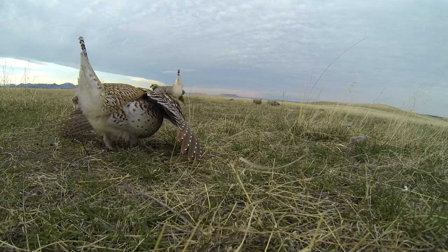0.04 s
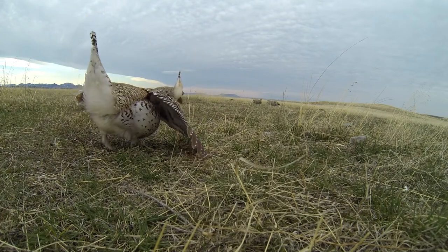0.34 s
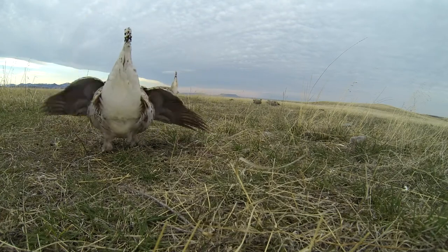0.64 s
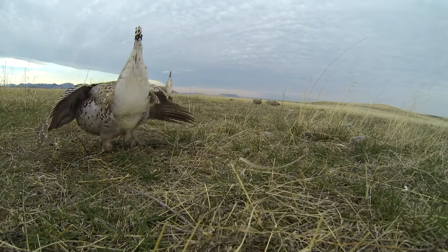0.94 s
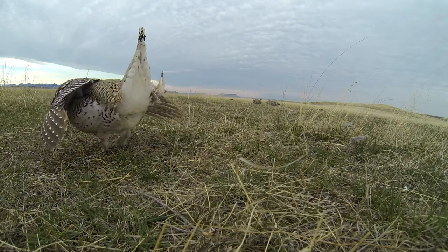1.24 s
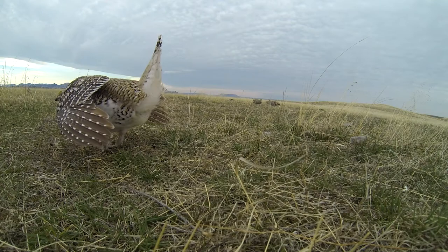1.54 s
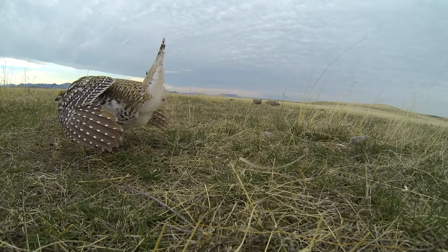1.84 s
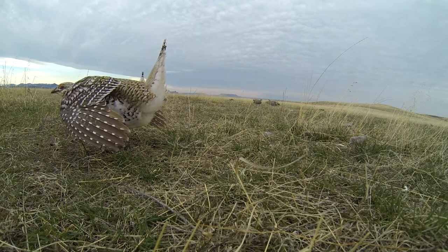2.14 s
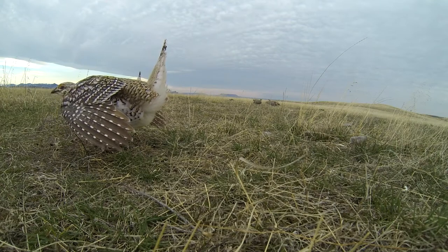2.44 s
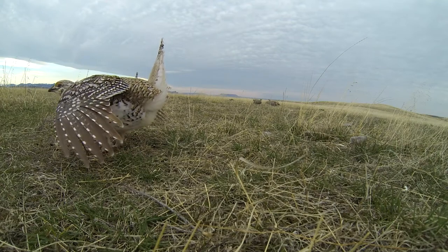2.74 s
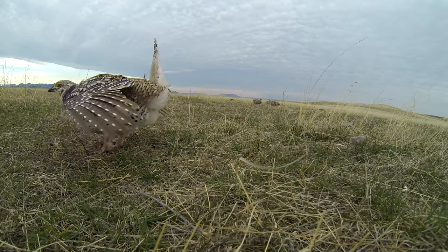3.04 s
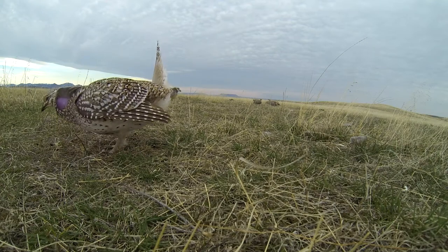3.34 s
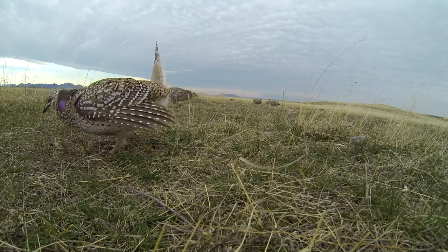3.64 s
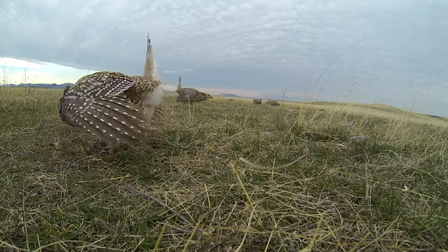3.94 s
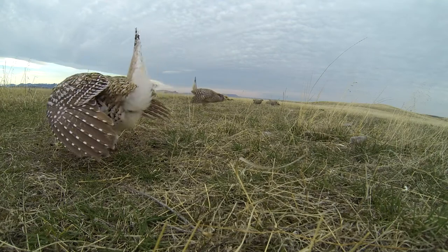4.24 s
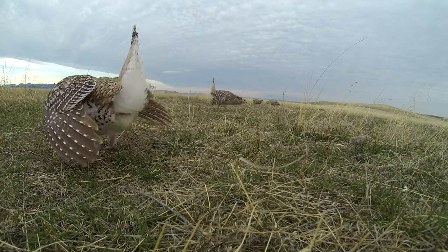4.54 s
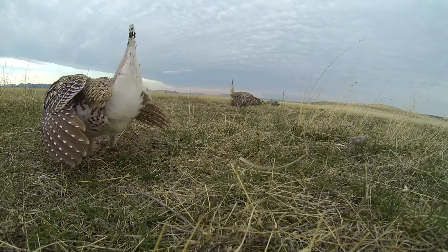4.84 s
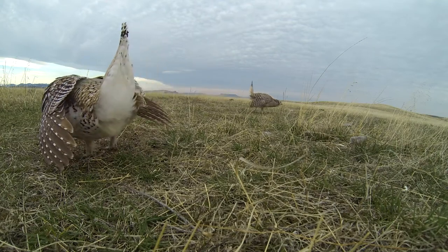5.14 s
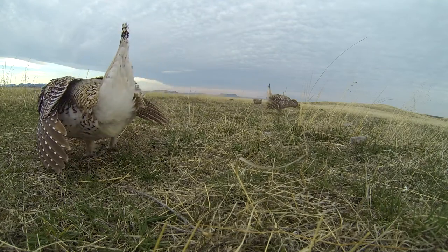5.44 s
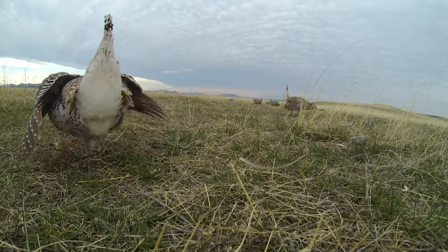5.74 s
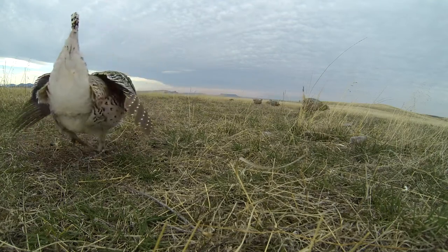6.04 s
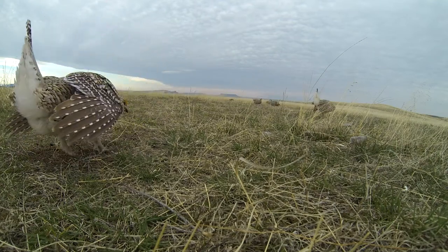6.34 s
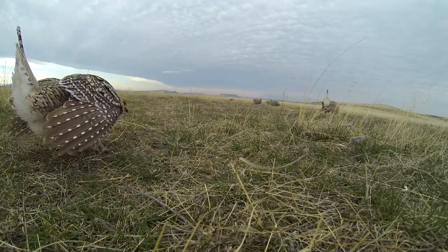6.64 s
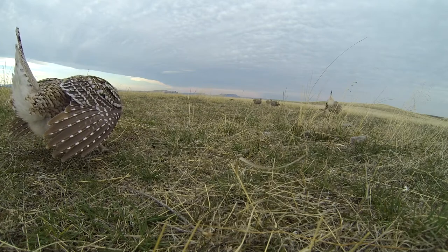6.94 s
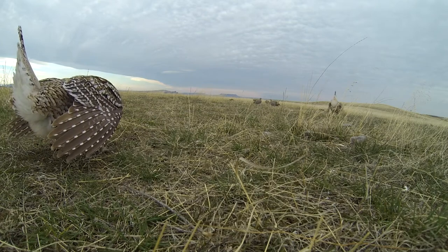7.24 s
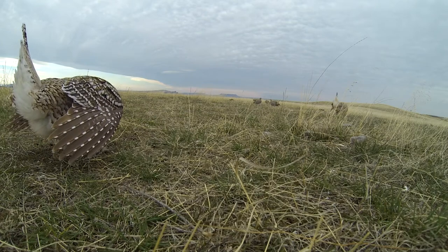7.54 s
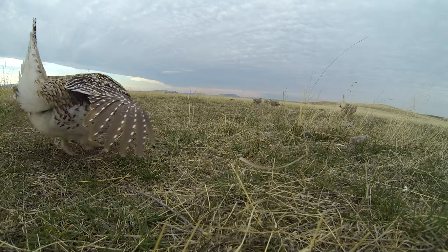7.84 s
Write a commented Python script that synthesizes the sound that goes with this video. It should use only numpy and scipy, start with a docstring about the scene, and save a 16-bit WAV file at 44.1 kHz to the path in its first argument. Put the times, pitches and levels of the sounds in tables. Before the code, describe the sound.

Light wind rumbles and hisses softly in open grassland throughout, with a faint, rapidly pulsing electronic hiss. In the first second a distant grouse faintly rattles its tail, and at 0.5 seconds a bird a little way off gives a quick cluster of squeaks. Faint, low coos come from far away now and then. Around 2.8 and 3.1 seconds, close feet thump softly and dry stems tick, followed by one short falling coo from the nearest grouse. From 4 to 4.8 seconds it gives a gobbling cackle of chirps, hollow hoots, gulps and clucks, starting quietly and loudest on a bright chirp at 4.5 seconds. A shorter, softer cackle follows from 5.3 to 5.5 seconds, then a faint thump. A tiny peep sounds near 7 seconds. At about 7.8 seconds a wing brushes the grass, with soft thumps and snapping stems.

```python
"""Grouse displaying on open grassland

A bird a little farther off squeaks; the nearest bird coos through its swollen neck sacs and gives two
gobbling cackles of chirps, hoots and clucks. Distant birds coo and one rattles its tail. Feet tick and
thump in dry grass, a light wind rumbles, and a camera lying in the grass adds a faint, pulsing hiss."""
import sys
import numpy as np
from scipy import signal
from scipy.fft import rfft, irfft, next_fast_len
from scipy.io import wavfile
from scipy.ndimage import uniform_filter1d, map_coordinates

SR = 44100
rng = np.random.default_rng(int(sys.argv[2]) if len(sys.argv) > 2 else 0)


def transcribe(u):
    """Save the signal u as a 16-bit wav file named by the first command-line argument.

    u: samples, shape (n,) or (channels, n), limited to [-1, 1]; the rate is SR.
    q: integer samples, one column per channel.
    """
    v = np.clip(np.atleast_2d(u).T, -1, 1)
    q = np.round(v * 32767).astype(np.int16)
    wavfile.write(sys.argv[1], SR, q)


N = 348390

# The tone colour of each noise: (frequency [Hz], relative level [dB])
STEADY_HISS_SPECTRUM = [(2000, -22), (4500, -5), (7000, -2.5), (8300, -0.5), (10000, 3), (10800, -5.5),
                        (12500, -5), (15000, -9.5)]
PULSING_HISS_SPECTRUM = [(1800, -22), (2900, 9.5), (4500, -4), (6000, -7.5), (7100, 3), (7700, 3),
                         (8400, -7.5), (9200, -3.5), (10000, 0), (11000, -15.5), (12400, 2), (13400, -5),
                         (14300, -4.5), (15200, -6)]
GROUND_WIND_SPECTRUM = [(12, -25.5), (20, 3), (49, -2), (107, -7), (214, -12), (239, -16.5), (353, -18),
                        (400, -34.5), (520, -52), (880, -120)]
GRASS_WIND_SPECTRUM = [(150, -25), (250, 0.5), (561, -3.5), (663, -4), (1140, -8), (1370, -8.5),
                       (2950, -12), (4870, -16.5), (7000, -23.5), (9100, -54), (15400, -120)]
WING_RUSTLE_SPECTRUM = [(150, 5), (700, -5), (2000, -11), (3800, -12), (6000, -15), (12000, -30.5)]
# Coos of distant birds: (time [s], length [s], starting pitch [Hz], relative level [dB])
DISTANT_COOS = [(1.018, 0.28, 398, -67.5), (2.05, 0.28, 413.4, -63), (2.514, 0.12, 427, -69),
                (3.432, 0.095, 394, -64.5), (3.563, 0.11, 431, -64), (4.885, 0.3, 413.3, -59),
                (6.709, 0.29, 420, -63.5), (7.3, 0.18, 405, -68.5), (7.636, 0.25, 409, -59)]
# Stems snapping underfoot: (time [s], level [dB], centre frequency [Hz], bandwidth [Hz])
STEM_SNAPS = [(.386, -64, 7650, 700), (.47, -56, 7100, 400), (0.46, -62, 4200, 2000),
              (2.826, -62.5, 6070, 4000), (3.096, -56.5, 3450, 680), (3.093, -60, 2530, 350),
              (4.755, -63, 3220, 480), (7.828, -60, 3650, 700), (7.898, -48, 3400, 600)]
# Soft footfalls and wing beats: (time [s], level [dB], pitch [Hz], time to fade by 60 dB [s])
SOFT_THUMPS = [(2.823, -30, 290, 0.0085), (3.087, -41.5, 165, 0.067), (3.104, -38.5, 235, 0.042),
               (3.118, -39.5, 129, 0.061), (5.677, -54.5, 162, 0.21), (7.818, -43.5, 167.4, .08),
               (7.837, -46, 202, 0.089)]
# Small gulps between the notes: (time [s], level [dB])
THROAT_GULPS = [(4.447, -39), (4.541, -54), (4.571, -44.5), (5.258, -63)]
# Squeaks, peeps and the faint ringing echo after the first squeak: (time [s], length [s],
# first pitch [Hz], middle pitch [Hz], last pitch [Hz], level [dB], overtones against that level [dB])
SQUEAKS_AND_ECHO = [(0.511, 0.012, 1330, 1290, 1180, -52, -22), (0.519, 0.0089, 4400, 4550, 4650, -51, -30),
                    (0.523, 0.01, 1150, 1240, 1340, -44, -12), (.526, 0.016, 3450, 3690, 3830, -41, -26),
                    (.527, .04, 2020, 2356, 1840, -39.5, -15), (0.538, 0.019, 4190, 4180, 4000, -46.5, -28),
                    (0.563, 0.016, 1970, 1390, 1200, -49, -15),
                    (0.578, 0.022, 1150, 1248, 1150, -40.5, -28), (0.597, .06, 1260, 1235, 1250, -62, -25),
                    (4.633, 0.022, 2400, 2520, 2640, -61.5, 0.5), (5.254, .034, 2330, 2450, 2580, -68, -10),
                    (5.44, .036, 2290, 2420, 2500, -72.5, 2), (7.032, .1, 3420, 3340, 3280, -72, -29)]
# How the throat colours the voice, before each call's tuning shifts it: (frequency [Hz], gain [dB])
THROAT_SPECTRUM = [(300, -48), (850, -30.5), (1060, -23), (1200, -4.5), (1310, -1), (1420, -4.5),
                   (1560, -14), (1650, -17), (1750, -36), (2000, -37), (2300, -65.5), (3150, -68),
                   (3500, -48), (3900, -68), (5500, -74), (6000, -60.5), (7200, -63), (9500, -84)]
# The course of the near coo: (time [s], pitch [Hz], sac resonance [Hz], sac level [dB], throat level [dB])
COO_SHAPE = [(3.14, 262, 288, -43, -51), (3.156, 390, 390, -40.5, -51), (3.168, 416, 467, -41, -44.5),
             (3.192, 412.4, 500, -35.5, -43.5), (3.25, 374.3, 412, -39, -52.5),
             (3.335, 343.6, 332, -37.5, -52), (3.352, 323, 310, -36.5, -56), (3.366, 263, 400, -46, -55),
             (3.39, 226, 420, -62, -69)]
# Bright cackle notes: (time [s], length [s], hold [s], pitch [Hz], sac level [dB], throat level [dB],
# dip as the voice breaks [dB], throat tuning [ratio])
CHIRP_NOTES = [(3.967, 0.062, 0.036, 375, -59, -59.5, 1, .99),
               (4.457, 0.075, .038, 461, -36.5, -11, 14, 0.97),
               (5.273, 0.083, 0.0594, 383.7, -45.5, -35.5, 13, 1.017)]
# Hollow cackle notes: (time [s], length [s], swoop [s], first pitch [Hz], lowest pitch [Hz],
# last pitch [Hz], sac level [dB], throat level [dB])
HOOT_NOTES = [(4.101, .055, .01, 330, 315, 760, -60.5, -77),
              (4.267, 0.053, 0.015, 400, 387, 520, -59.5, -75),
              (4.414, 0.036, .008, 500, 475, 770, -63, -69), (4.581, .058, 0.013, 1268, 400, 706, -42, -38),
              (4.723, 0.018, .006, 380, 345, 360, -42, -51),
              (5.388, 0.0685, .023, 910, 404, 770, -50.5, -55)]
# Tumbling cackle notes: (time [s], length [s], first pitch [Hz], main pitch [Hz], fall [octaves/s],
# rise time [s], sac level [dB], throat level [dB])
CLUCK_NOTES = [(4.159, 0.044, 535, 521, 20, 0.0074, -54.5, -78),
               (4.651, 0.034, 966, 593.5, 28.5, 0.014, -31, -30),
               (4.757, 0.034, 527, 516, 39, .014, -36, -43),
               (5.476, 0.054, 704, 474, 13.6, 0.019, -38.5, -47.5)]

SETTLE_S = 0.0038  # chirps and clucks start high and drop onto their pitch this quickly


def amp(db):
    """Turn decibels into a gain to multiply by."""
    return 10 ** (np.asarray(db) / 20)


def unit(x):
    """Scale x to an average (rms) level of 1."""
    return x / np.sqrt(np.mean(x ** 2) + 1e-20)


def gain_at(spectrum, hz):
    """Read the gain at any frequency from a spectrum table."""
    table_hz, table_db = np.transpose(spectrum)
    return amp(np.interp(np.log(hz + 1), np.log(table_hz + 1), table_db))


def wobble(rate, size):
    """A smooth curve through `rate` random values a second."""
    values = rng.standard_normal(int(size * rate / SR) + 4)
    return map_coordinates(values, [np.arange(size) * rate / SR])


def add(track, time, sound):
    """Mix a sound into the track at a time in seconds."""
    start = min(max(round(time * SR), 0), N)
    track[start:start + len(sound)] += sound[:N - start]


def faded(x):
    """Round off both ends over 2 ms so they do not click."""
    n = np.arange(len(x))
    from_edge = np.minimum(n, n[::-1])
    return x * np.sin(np.pi / 2 * np.minimum(from_edge / (0.002 * SR), 1))


def envelope_db(t, length, attack, release, depth_db=25):
    """A note's level: it rises, holds, then falls."""
    return -depth_db * (np.maximum(1 - t / attack, 0) + np.maximum(1 - (length - t) / release, 0))


def filtered(x, response):
    """Scale each frequency in x by response(hz)."""
    size = next_fast_len(N + SR // 2)
    return irfft(rfft(x, size) * response(np.fft.rfftfreq(size, 1 / SR)), size)[:N]


def noise(spectrum):
    """Noise with the given tone colour, at an average level of 1."""
    return unit(filtered(rng.standard_normal(N), lambda hz: gain_at(spectrum, hz)))


def resonate(x, spectrum, size=4096):
    """Let x ring in a hollow space with the given tone colour."""
    cepstrum = irfft(np.log(gain_at(spectrum, np.fft.rfftfreq(size, 1 / SR))))
    # folding this in half makes the ringing follow the sound and never come before it
    cepstrum[1:size // 2] *= 2
    cepstrum[size // 2 + 1:] = 0
    ringing = irfft(np.exp(rfft(cepstrum)))
    return signal.fftconvolve(x, ringing)[:N]


def phase_of(pitch_hz, jitter):
    """The running angle of a slightly unsteady vibration."""
    return 2 * np.pi * np.cumsum(pitch_hz * (1 + jitter * wobble(300, len(pitch_hz)))) / SR


def snap(centre_hz, width_hz, swell_s):
    """A tiny burst of noise around one frequency, swelling to its peak after 2 * swell_s."""
    t = np.arange(-2 * swell_s, 2 * swell_s, 1 / SR)
    swell = np.exp(-(t / swell_s) ** 2)
    slow_noise = wobble(2 * width_hz, len(t)) + 1j * wobble(2 * width_hz, len(t))
    band = (slow_noise * np.exp(2j * np.pi * centre_hz * t)).real
    return unit(swell * band) * np.sqrt(np.mean(swell ** 2))


def camera_hiss(pictures_per_s=29.97):
    """The camera's electronics hiss; part of the hiss switches on and off once per picture."""
    cycle = np.arange(N) / SR * pictures_per_s % 1
    switched_on = uniform_filter1d(((cycle > 0.345) & (cycle < 0.875)) * 1.0, size=50)
    steady = amp(-76.5) * noise(STEADY_HISS_SPECTRUM)
    return steady + amp(-71.5) * switched_on * noise(PULSING_HISS_SPECTRUM)


def wind():
    """Light wind rumbles over the ground and hisses evenly in the grass."""
    rumble = amp(-61 + 0.35 * wobble(1.5, N) + 0.609 * wobble(11, N)) * noise(GROUND_WIND_SPECTRUM)
    grass = amp(-66.5 + 0.3 * wobble(5, N)) * noise(GRASS_WIND_SPECTRUM)
    return rumble + grass


def meadow_echo(x, fade_s):
    """Grass and ground scatter a sound into a short tail that loses 60 dB in fade_s."""
    t = np.arange(SR // 3) / SR
    tail = rng.standard_normal(len(t)) * amp(-60 * t / fade_s) * (1 - np.exp(-t / 0.004))
    return signal.fftconvolve(x, tail / np.linalg.norm(tail))[:N]


def distant_coos():
    """From far away only the lowest tone of a falling coo carries, wavering in the wind."""
    out = np.zeros(N)
    for time, length, start_hz, db in DISTANT_COOS:
        t = np.arange(0, length, 1 / SR)
        octaves_down = 1.156 * t + 0.19 * np.exp((t - length) / 0.015)  # slow sag, then a last drop
        pitch = start_hz * 2 ** -octaves_down * (1 + 0.012 * wobble(24.2, len(t)))
        edges_db = envelope_db(t, length, attack=0.096, release=0.023, depth_db=8.5)
        level_db = db + edges_db + 1.5 * wobble(23.4, len(t))
        add(out, time, faded(amp(level_db) * np.sin(phase_of(pitch, jitter=0.019))))
    return out


def tail_rattle(count=22, gap_s=0.052):
    """A dancing bird farther off clicks its tail quills in a run that swells and fades."""
    out = np.zeros(N)
    for i, (lateness, strength) in enumerate(rng.standard_normal((count, 2))):
        db = -72 + 3.9 * np.sin(np.pi * i / count) + 1.3 * strength
        click = snap(centre_hz=3420, width_hz=470, swell_s=0.005)
        add(out, 0.044 + i * gap_s + 0.002 * lateness, amp(db) * click)
    return out


def squeaks_and_echo(arch_db=20):
    """Squeaks a little farther off, and one faint echo: fluttering tones, loudest in the middle."""
    out = np.zeros(N)
    for time, length, first_hz, middle_hz, last_hz, db, overtone_db in SQUEAKS_AND_ECHO:
        place = np.linspace(-1, 1, round(length * SR))  # 0 is the middle of the note
        bend_hz = (first_hz + last_hz) / 2 - middle_hz
        pitch = middle_hz + (last_hz - first_hz) / 2 * place + bend_hz * place ** 2
        phase = phase_of(pitch, jitter=0.01)
        overtones = np.sin(2 * phase) + amp(-5) * np.sin(3 * phase)
        tone = np.sin(phase) + amp(overtone_db) * overtones
        flutter = 1 + 0.15 * wobble(900, len(pitch))
        add(out, time, faded(amp(db - arch_db * place ** 2) * flutter * tone))
    return out


def wing_rustle(peak_s=7.86, swell_s=0.068):
    """A lowered wing brushes the dry grass."""
    swell = np.exp(-((np.arange(N) / SR - peak_s) / swell_s) ** 2)
    return amp(-63) * swell * noise(WING_RUSTLE_SPECTRUM)


def stem_snaps(swell_s=0.003):
    """Dry stems tick as they break underfoot."""
    out = np.zeros(N)
    for time, db, centre_hz, width_hz in STEM_SNAPS:
        add(out, time - 2 * swell_s, amp(db) * snap(centre_hz, width_hz, swell_s))
    return out


def thumps():
    """Feet and wings thump dully: each is a low tone that dies away fast."""
    out = np.zeros(N)
    t = np.arange(SR // 4) / SR
    soft_start = 1 - np.exp(-t / 0.0022)
    for time, db, hz, fade_s in SOFT_THUMPS:
        add(out, time, amp(db - 60 * t / fade_s) * soft_start * np.sin(2 * np.pi * hz * t))
    return out


def gulps(swell_s=0.0024):
    """The throat gulps with a short, hollow pop."""
    out = np.zeros(N)
    for time, db in THROAT_GULPS:
        add(out, time - 2 * swell_s, amp(db) * snap(centre_hz=1250, width_hz=140, swell_s=swell_s))
    return out


def voice(pitch, sac_hz, sac_db, throat_db, tuning, sac_sharpness, rasp_db):
    """The voice box makes harmonics (multiples of the pitch) that leave by the neck sacs and throat."""
    multiple = np.arange(1, 25)[:, None]
    harmonic_hz = multiple * pitch
    # held notes are clean; the voice shakes and rasps where its pitch slides fast
    slide = np.minimum(np.abs(np.gradient(np.log(pitch))) * SR, 40)
    shake = amp(0.1079 * slide * wobble(301.8, len(pitch)))
    harmonics = shake * np.cos(multiple * phase_of(pitch, jitter=0.00385 + 0.0015 * slide))
    # the sacs favour the harmonic nearest their resonance and block the treble
    mismatch = sac_sharpness * (harmonic_hz / sac_hz - sac_hz / harmonic_hz)
    sac_gain = 1 / (1 + mismatch ** 2) / (1 + (harmonic_hz / 1300) ** 8)
    chest = amp(-18.5) * harmonics[0]  # a little of the lowest tone leaves through the body
    sacs = faded(amp(sac_db) * (np.sum(sac_gain * harmonics, axis=0) + chest))
    rasp = amp(rasp_db) * slide * rng.standard_normal(len(pitch))
    buzz = faded(amp(throat_db) * (harmonics.sum(axis=0) + rasp))
    throat = resonate(buzz, [(hz * tuning, db) for hz, db in THROAT_SPECTRUM])
    return throat + np.pad(sacs, (0, len(throat) - len(sacs)))


def coo():
    """One long note that lifts, then slowly falls, mostly from the full neck sacs."""
    out = np.zeros(N)
    times, *columns = np.transpose(COO_SHAPE)
    t = np.arange(times[0], times[-1], 1 / SR)
    pitch, sac_hz, sac_db, throat_db = [np.interp(t, times, column) for column in columns]
    note = voice(pitch, sac_hz, sac_db, throat_db, tuning=0.946, sac_sharpness=3.05, rasp_db=-22)
    add(out, times[0], note)
    return out


def chirps(sag_octaves_per_s=1.7, fall_octaves_per_s=12.5, first_hz=951.5):
    """The open throat holds a bright, sagging note; then the voice breaks and falls."""
    out = np.zeros(N)
    for time, length, hold, pitch_hz, sac_db, throat_db, dip_db, tuning in CHIRP_NOTES:
        t = np.arange(0, length, 1 / SR)
        octaves_down = sag_octaves_per_s * t + fall_octaves_per_s * np.maximum(t - hold, 0)
        pitch = pitch_hz * 2 ** -octaves_down + (first_hz - pitch_hz) * np.exp(-t / SETTLE_S)
        sac_hz = 1.47 * pitch  # between the first two harmonics
        edges_db = envelope_db(t, length, attack=0.01106, release=0.0042, depth_db=19.5)
        break_db = dip_db * np.exp(-((t - hold - 0.024) / 0.009) ** 2)
        add(out, time, voice(pitch, sac_hz, sac_db + edges_db, throat_db + edges_db - break_db,
                             tuning, sac_sharpness=2.5, rasp_db=-19))
    return out


def hoots():
    """Hollow notes swoop down and curl up again while the sacs ring on the lowest tone."""
    out = np.zeros(N)
    for time, length, swoop, first_hz, low_hz, last_hz, sac_db, throat_db in HOOT_NOTES:
        t = np.arange(0, length, 1 / SR)
        down = np.minimum(t / swoop, 1)
        up = np.maximum((t - swoop) / (length - swoop), 0)
        pitch = first_hz * (low_hz / first_hz) ** down + (last_hz - low_hz) * up ** 2.8
        edges_db = envelope_db(t, length, attack=0.0029, release=0.008)
        push_db = 5.5 * np.exp(-((up - 0.78) / 0.11) ** 2)
        sac_level = sac_db + edges_db + push_db - 2.5 * down  # the sacs slacken in the swoop
        throat_level = throat_db + edges_db - 13 * down ** 4  # and the throat closes
        add(out, time, voice(pitch, pitch, sac_level, throat_level,
                             tuning=0.93, sac_sharpness=2.5, rasp_db=-17))
    return out


def clucks(sac_fade_db=19.5, throat_fade_db=30):
    """Short notes peak early and tumble in pitch while the sacs ring on the second harmonic."""
    out = np.zeros(N)
    for time, length, first_hz, pitch_hz, fall, rise, sac_db, throat_db in CLUCK_NOTES:
        t = np.arange(0, length, 1 / SR)
        pitch = pitch_hz * 2 ** (-fall * t) + (first_hz - pitch_hz) * np.exp(-t / SETTLE_S)
        attack_db = -20 * np.maximum(1 - t / rise, 0) ** 2
        fade = np.maximum((t - rise) / (length - rise), 0)
        sac_level = sac_db + attack_db - sac_fade_db * fade
        throat_level = throat_db + attack_db - throat_fade_db * fade
        add(out, time, voice(pitch, 2.02 * pitch, sac_level, throat_level,
                             tuning=0.96, sac_sharpness=2.7, rasp_db=-13.5))
    return out


def scene():
    """Birds over wind and hiss: the farther away a sound is, the more of it the meadow scatters."""
    near = coo() + chirps() + hoots() + clucks() + gulps() + stem_snaps() + thumps() + wing_rustle()
    middle = squeaks_and_echo() + tail_rattle()
    far = distant_coos()
    echoes = (meadow_echo(amp(-36.5) * near, fade_s=0.12)
              + meadow_echo(amp(-16.5) * middle, fade_s=0.15)
              + meadow_echo(amp(-8) * far, fade_s=0.3))
    return (near + middle + amp(0.5) * far + echoes + wind() + camera_hiss())[None]


def record(dry):
    """The camera keeps nothing above 15300 Hz."""
    return filtered(dry[0], lambda hz: hz <= 15300)[None]


dry = scene()
out = record(dry)
transcribe(out)
```